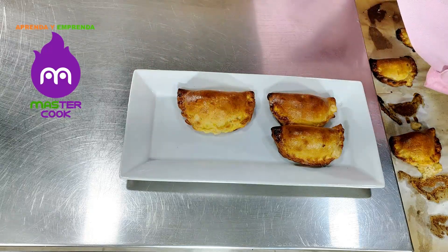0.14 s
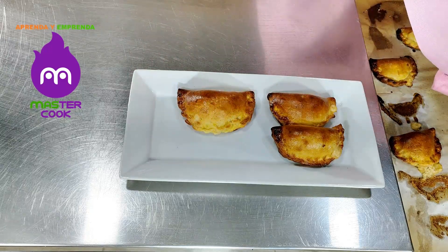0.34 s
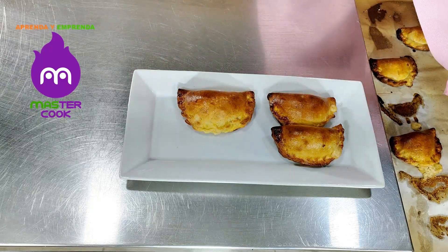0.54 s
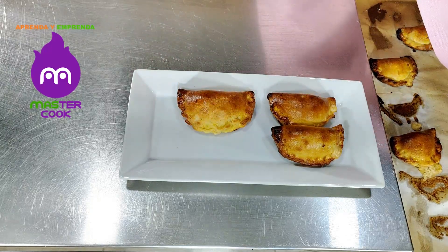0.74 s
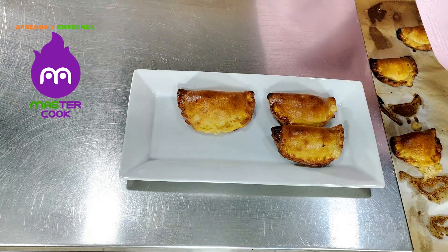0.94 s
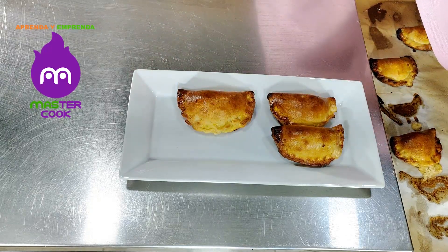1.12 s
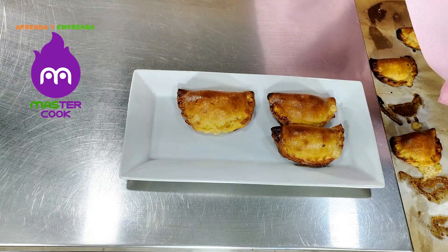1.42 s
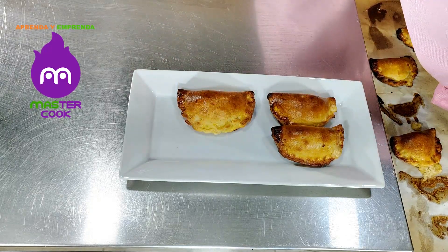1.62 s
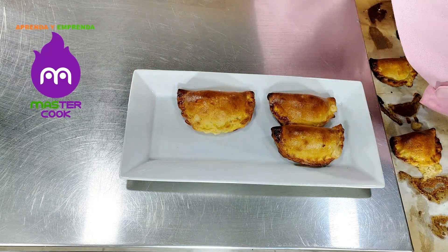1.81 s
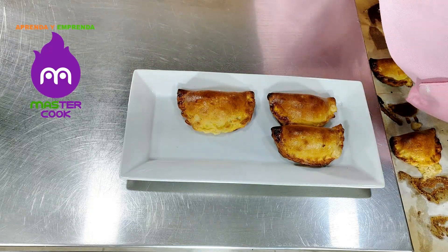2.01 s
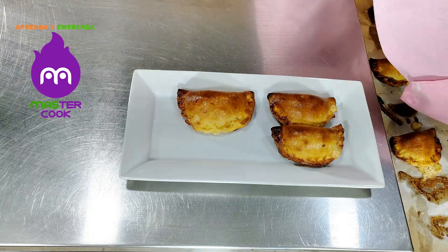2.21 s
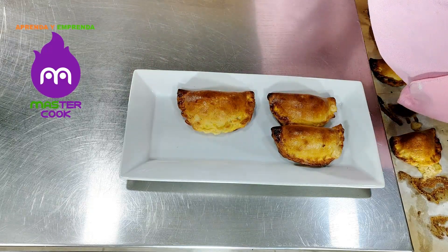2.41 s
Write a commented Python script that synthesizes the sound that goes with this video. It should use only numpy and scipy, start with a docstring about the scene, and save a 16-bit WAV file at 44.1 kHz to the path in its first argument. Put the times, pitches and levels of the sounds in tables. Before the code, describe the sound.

After a nearly quiet start, dry paper crackles loudly in two dense pulls, then a shorter, lighter one, fading to sparse ticks; close stereo microphones, sound stronger and brighter on the right, low kitchen hum underneath.

```python
"""First come faint crackles over a low, wavering hum; then loud snaps, as baking paper is pulled off pastries.
In three pulls, close by and to the right, creases snap as short noise bursts through a ringing filter, while
random ticks and a dense fizz make the crust letting go. Filtered noise and random clicks make the rustle and
soft thuds. A metal tray rings along, and echoes and a short blend of random tails give the hard kitchen.
"""
import sys
import numpy as np
from scipy import signal
from scipy.fft import rfft, irfft
from scipy.io import wavfile

SR = 44100
rng = np.random.default_rng(int(sys.argv[2]) if len(sys.argv) > 2 else 0)


def to_wav(sig):
    """Store sig (one row per channel, or 1-D mono) as 16-bit WAV at the path in sys.argv[1].

    Samples outside -1..1 are clipped; the rate is SR.
    """
    pcm = np.clip(np.atleast_2d(sig), -1, 1) * 32767
    pcm = np.round(pcm).astype(np.int16)
    wavfile.write(sys.argv[1], SR, pcm.T)  # frames by channels


N = 112454  # length in samples

# creases snapping over
# [t/s, strength/dB before SNAP_DB, ring f/Hz, treble/dB, share of energy in the flutter (0-1)]
CREASE_SNAPS = [(0.009, -25, 3260, -8, 0.7), (0.0461, -24.5, 3220, -26, 0.8), (0.0695, -29, 4480, -21, 0.7),
                (0.113, -19, 5630, -6, 0.3), (0.1817, -13, 5600, -2, 0.4), (0.192, -8.5, 5940, -6, 0.65),
                (0.2023, -8, 6420, 0, 0), (0.2137, -6, 5600, -9, 0.5), (0.2203, -6, 5840, -9, 0.36),
                (0.2291, -8, 5030, -8, 0.5), (0.2517, 1.5, 5300, -5, 0.65), (0.261, -3.5, 5330, -14, 0.86),
                (0.2868, 1, 5760, -6.5, 0.24), (0.2914, -4, 5700, -15, 0.7), (0.299, 2.5, 5720, -9, 0.1),
                (0.303, -3, 5860, -6, 0.4), (0.313, -1.5, 5530, -2, 0.6), (0.3258, 3.5, 5900, -3, 0.54),
                (0.3453, -9, 5110, 9, 0.8), (0.3491, -4, 4520, -21, 0.3), (0.3597, -11, 5610, -20, 0.4),
                (0.4069, -3.5, 5630, 0, 0.84), (0.41, -1.5, 5330, -16, 0.06), (0.422, -5, 5530, -7, 0),
                (0.4454, -2.5, 3980, -8, 0.5), (0.4646, -12, 3600, -3, 0.7), (0.5045, 1, 5000, -7.5, 0.3),
                (0.5127, 3.5, 4070, -7, 0.8), (0.5166, -1, 5050, -7, 0.8), (0.5573, 0.5, 5330, -10, 0.85),
                (0.561, 1, 5770, -9, 0.3), (0.5766, -4.5, 6360, -2, 0.5), (0.6096, -10.5, 3400, -8, 0.4),
                (0.624, -7.5, 6960, 1, 0.1), (0.6687, -8, 4960, -5, 0.51), (0.6981, -4, 5280, -1, 0.4),
                (0.7079, -1.5, 5900, -11, 0.7), (0.7101, -1.5, 6900, -13, 0.65),
                (0.7435, -2, 5100, -22, 0.3), (0.78, -1, 3960, -11, 0.22), (0.8033, -11, 6000, -8, 0.31),
                (0.81, -7.5, 4140, -5, 0.2), (0.8187, -2, 7180, -3, 0.25), (0.8214, -4.5, 3080, -27, 0.76),
                (0.8358, -7.5, 3900, 2.5, 0.6), (0.8636, -13, 4100, -3, 0), (0.8816, -21, 4370, 7, 0.3),
                (0.9456, -13, 5470, -13, 0.6), (0.9649, 0.5, 4340, -6.5, 0.45),
                (0.9892, -5.5, 4300, -4, 0.2), (1.0264, -2.5, 6320, -6.5, 0.63),
                (1.0482, -6.5, 5000, -10, 0.5), (1.07, -11.5, 5800, -5, 0.42), (1.0968, -1.5, 5490, 1, 0.3),
                (1.1004, -2.5, 5680, -2.5, 0.4), (1.1241, -3.5, 4240, -10, 0.4),
                (1.1394, 3.5, 4890, -3.5, 0.12), (1.143, -2, 5460, -16, 0.5), (1.1827, 1.5, 5980, -7, 0.4),
                (1.2, 5, 6100, -7.5, 0.18), (1.2128, 4.5, 4940, -2.5, 0.77), (1.2629, -9.5, 5030, -18, 0),
                (1.3119, -0.5, 5290, -4.5, 0.51), (1.3256, -3, 3870, -6, 0.6), (1.3471, -6.5, 5840, -4, 0),
                (1.362, 4, 4300, -8, 0.48), (1.3677, 5, 6400, -6, 0.7), (1.3696, 5, 5620, -13, 0.46),
                (1.386, -12, 5920, -4, 0.8), (1.4686, -9.5, 4210, -12, 0.4), (1.503, 1.5, 5250, -13.5, 0.5),
                (1.535, -7.5, 6400, -11.5, 0.1), (1.557, -12.5, 6700, -7, 0.1), (1.606, -12.5, 6100, -3, 0),
                (1.6437, -5, 4830, -3, 0.3), (1.7261, -21, 4950, -27, 0.4), (1.815, -13, 6750, -14.5, 0.06),
                (1.8487, -16, 6200, -15, 0.5), (1.862, -11, 6260, -10, 0.65), (1.8758, -9.5, 5650, -8, 0.2),
                (1.8927, -12.5, 7100, -15, 0.52), (1.9356, -6, 5490, 5, 0.85),
                (1.9449, 0.5, 5500, -3.5, 0.57), (1.9475, -4, 5300, -10, 0.4),
                (1.9675, -9.5, 6300, -4, 0.5), (2.0863, -16, 6300, -7, 0.26),
                (2.118, -17.5, 5130, -2, 0.04), (2.4282, -12.5, 7570, -4, 0.15),
                (2.4795, -26, 3100, -13, 0.8), (2.5437, -15.5, 5710, -10, 0.05)]
# tone of a snap before its ring is added [f/Hz, level/dB per Hz]
SNAP_TONE = [(100, -25), (500, -28), (1200, -17.5), (2200, -2.5), (3300, 0.5), (6000, -1), (8000, 1.5),
             (11500, 8), (16000, -3)]
SNAP_DB = -2.5  # added to the strength of every snap
CRACK_S, FLUTTER_S = .00028, .0021  # time scales of the sharp crack and the flutter
LEAD_S = .0003  # a snap starts this far ahead of its listed time
RING_DB, RING_OCTAVES = 9.5, .32  # height and width of a snap's ring; ticks share the width
TREBLE_HZ = 8710  # the treble setting acts mostly above this

# loudness of the crackle, one curve for each pull and for the sheet settling
# [t/s, level/dB before TICK_DB or FIZZ_DB]
CRACKLE_CURVES = [
    [(0, -52), (.1, -67), (.17, -72)],
    [(.175, -68), (.2, -38.5), (.275, -39.5), (.3, -35), (.345, -26), (.385, -47), (.41, -33), (.48, -29),
     (.52, -28), (.575, -36.5), (.66, -36.5), (.705, -29.5), (.765, -46.5), (.83, -38.5), (.87, -45),
     (.92, -81)],
    [(.955, -43), (.985, -30.5), (1.015, -44.5), (1.08, -37.5), (1.1, -28), (1.16, -35), (1.215, -31),
     (1.25, -38.5), (1.3, -48), (1.36, -43), (1.41, -33), (1.5, -48), (1.59, -43.5), (1.645, -40),
     (1.68, -72)],
    [(1.7, -55.5), (1.82, -47), (1.865, -45.5), (1.925, -45.5), (1.945, -32.5), (1.98, -41.5), (2.02, -52),
     (2.07, -49), (2.11, -52), (2.2, -68), (2.35, -74)],
    [(2.42, -56), (2.445, -56), (2.48, -54.5), (2.52, -68), (2.55, -42.5)],
]
# tone of the crackling paper, before a tick's own ring [f/Hz, level/dB per Hz]
PAPER_TONE = [(100, -48), (450, -11.5), (900, -15.5), (1500, -9.5), (2200, 0), (3200, 5), (5700, 3),
              (7800, 2), (8900, -7), (11500, -3), (14000, -6), (16000, -22)]
TICKS_PER_S, TICK_SPREAD_DB, TICK_DB = 380, 3.6, -2.5  # rate, unevenness, level
TICK_RING_DB, TICK_TREBLE_SPREAD_DB = 6.5, 4.5
FIZZ_SLIPS_PER_S, FIZZ_SPREAD_DB, FIZZ_DB = 4000, 3, -12
LEFT_OWN = .72  # share of the left side's energy that is unlike the right's, before filtering

# the whole sheet bending [t/s, level/dB]
SHEET_LEVEL = [(0, -63), (.16, -72), (.28, -63), (.33, -54), (.48, -54.5), (.52, -42), (.57, -44),
               (.62, -53), (.72, -48.5), (.85, -49), (.89, -63), (.97, -53.5), (1.07, -57), (1.12, -47.5),
               (1.23, -46), (1.31, -53), (1.375, -48.5), (1.46, -55), (1.8, -63.5), (1.96, -55),
               (2.02, -74), (2.25, -80.5), (2.55, -76)]
# tone of its dull rustle [f/Hz, level/dB per Hz]
SHEET_TONE = [(60, -10.5), (200, -7.5), (430, -10), (620, -3.5), (1000, 0.5), (1500, 3), (2100, 9),
              (3200, -27.5), (8000, -29)]
# short bands of rustling noise: scrapes, mid-pitched thuds and one low murmur at the start
# [t/s, length/s, level/dB, centre f/Hz]
RUSTLE_BANDS = [(0, 0.063, -62.5, 410), (.502, 0.027, -45, 800), (1.09, 0.1, -47.5, 1530),
                (1.362, 0.025, -47.5, 934), (1.59, .065, -54, 11140), (1.84, 0.09, -50, 1820),
                (2.04, 0.043, -46.5, 11000)]
BAND_OCTAVES = .24  # from the centre to half gain

# ringing modes of the metal tray [f/Hz, level/dB against the paper]
TRAY_MODES = [(1478, 5.5), (2365, -3), (2533, -6), (3500, -2), (3877, -17), (3991, -19)]
TRAY_T60_S = .15  # time to fade by 60 dB

# fade of the kitchen's tail [f/Hz, time to fade by 60 dB/s]
ROOM_FADE = [(200, 0.32), (1000, 0.68), (4000, 0.41), (8000, 0.33), (16000, 0.13)]
# near echoes off the worktop and nearby things [delay/s, left level/dB, right level/dB]
NEAR_ECHOES = [(.0018, -15, -53), (.0082, -17.5, -29), (0.0137, -20.5, -20)]
# dulling of the direct sound at the left microphone [f/Hz, level/dB]
LEFT_DULLING = [(200, -2), (1200, -2.5), (2400, -6.5), (4000, -9), (8000, -14), (16000, -22)]
LEFT_LAG_S = .0003
ROOM_DB, ROOM_LEFT_DB = -9, -4  # right tail level; left tail relative to right
ROOM_GAP_S = .006  # delay before the tail
TAIL_SWING_S = .05  # time for each tail's share to swing from one extreme to the other

# soft thuds of pastry and hand on the tray [t/s, length/s, level/dB]
SOFT_THUDS = [(0.157, 0.33, -62.5), (0.486, 0.038, -62), (0.546, 0.047, -51.5), (1.185, 0.061, -56),
              (1.62, 0.04, -64), (1.934, 0.05, -62.5)]
# tone of the thuds [f/Hz, level/dB per Hz]
THUD_TONE = [(25, -2), (70, 9), (120, 5.5), (240, 11), (400, 1), (600, -7), (1000, 3), (3000, -58)]

# a faint, wandering low rumble [t/s, centre f/Hz, level/dB]
RUMBLE_PATH = [(0, 225.3, -61), (.19, 205, -67), (.25, 240.3, -60), (.3, 251.6, -66), (.35, 320.6, -62),
               (.46, 300.3, -68.5), (.62, 129.6, -66.5), (.95, 130.2, -65.5), (1.14, 280.6, -61.5)]
# how the rumble spreads around its centre [distance from centre f/Hz, level/dB]
RUMBLE_BLUR = [(28, 0), (220, -28)]

# tone of the steady kitchen air [f/Hz, level/dB per Hz]
AIR_TONE = [(20, -22.5), (50, -0.5), (75, -11), (110, 4), (150, -3), (210, 3), (300, 0), (450, -11.5),
            (850, -10.5), (1150, -31), (2500, -20.5), (7500, -21.5), (16000, -38)]
AIR_DB = -67
# loudness of the low hum [t/s, level/dB]
HUM_LEVEL = [(0, -75.5), (.9, -71), (1.35, -76), (1.58, -66), (1.7, -77.5), (1.9, -81), (2.15, -66),
             (2.35, -92), (2.55, -94)]
# slow wavering of the hum's pitch [f/Hz, level/dB]
HUM_WAVER = [(8, 11), (30, -61)]
HUM_HZ, HUM_WAVER_HZ = 75, 4  # middle pitch and rms size of its wavering

EDGE_HZ = 16000  # sound well above this is removed


def snaps():
    """A crease flips with a short crack, then flutters for a few milliseconds."""
    out = np.zeros((2, N))
    for start, db, hz, treble_db, share in CREASE_SNAPS:
        share = np.clip(share, .05, .95)
        click = ring(SNAP_TONE, hz, RING_DB, treble_db)
        crack = np.sqrt(1 - share) * burst(click, CRACK_S)
        flutter = np.sqrt(share) * burst(click, FLUTTER_S)
        sound = crack + flutter
        sound /= np.linalg.norm(sound[1])  # right side gets energy 1
        add(out, start - LEAD_S, amp(db + SNAP_DB) * sound)
    return out


def crackle(count=90):
    """Small facets tick, each with its own ring, over the fine fizz of crust letting go."""
    ticks = np.zeros((2, N))
    ticks_each = round(TICKS_PER_S * N / SR / count)
    for hz in np.geomspace(2700, 9000, count):
        treble_db = TICK_TREBLE_SPREAD_DB * rng.standard_normal()
        click = ring(PAPER_TONE, hz, TICK_RING_DB, treble_db)
        tick = burst(click, rng.uniform(CRACK_S, FLUTTER_S))
        for when, size in rng.random((ticks_each, 2)):
            # few ticks are big; the small offset caps the biggest
            tick_db = -TICK_SPREAD_DB * np.log(size + .087)
            add(ticks, when * N / SR, amp(tick_db) * tick)
    fizz = colour(slips(FIZZ_SLIPS_PER_S, FIZZ_SPREAD_DB), PAPER_TONE)
    loudness = sum(level(curve) for curve in CRACKLE_CURVES)
    return loudness * (amp(TICK_DB) * unit(ticks) + amp(FIZZ_DB) * unit(fizz))


def sheet():
    """The whole sheet bends in many tiny slips, heard as a duller rustle."""
    rustle = colour(slips(1500, 5.0), SHEET_TONE)
    return level(SHEET_LEVEL) * unit(rustle)


def rustle_bands():
    """Scrapes, mid-pitched thuds and a low murmur: dense random clicks through one resonance each."""
    out = np.zeros((2, N))
    f = np.fft.rfftfreq(N, 1 / SR)
    for start, length, db, hz in RUSTLE_BANDS:
        band = 1 / (1 + (np.log2((f + 1) / hz) / BAND_OCTAVES) ** 2)
        noise = irfft(rfft(slips(3000, 4.7)) * band, N)
        out += amp(db) * swell(start, length) * unit(noise)
    return out


def tray(paper):
    """The metal tray under the paper rings along in a few fading tones."""
    t = np.arange(SR // 2) / SR
    modes = sum(amp(db - 60 * t / TRAY_T60_S) * np.cos(2 * np.pi * hz * t) for hz, db in TRAY_MODES)
    modes *= 2 * np.log(1000) / (TRAY_T60_S * SR)  # makes each level the gain at its pitch
    return signal.fftconvolve(paper, modes[None], axes=1)[:, :N]


def kitchen(paper, count=3):
    """Sound reaches the left later and duller; echoes follow, and a blend of tails with swinging shares."""
    out = np.zeros((2, N))
    out[1] = paper[1]
    add(out[:1], LEFT_LAG_S, colour(paper[:1], LEFT_DULLING))
    for delay, left_db, right_db in NEAR_ECHOES:
        add(out, delay, amp([[left_db], [right_db]]) * paper)
    t = np.arange(N) / SR
    for k in range(count):
        # the shares swing steadily in turn, keeping the total energy even
        share = np.sqrt(2 / count) * np.cos(np.pi * (t / TAIL_SWING_S + k / count))
        add(out, ROOM_GAP_S, signal.fftconvolve(share * paper[1:], tail(), axes=1))
    return out


def tail(size=256):
    """Stereo ring of the room: sparse random reflections, the treble dying first."""
    taps = rng.standard_normal((2, SR)) * (rng.random((2, SR)) < 2500 / SR)
    hz, t, z = signal.stft(taps, SR, nperseg=size)
    fade = amp(-60 * t / read(ROOM_FADE, hz)[:, None])
    echo = signal.istft(z * fade, SR, nperseg=size)[1]
    echo /= np.linalg.norm(echo, axis=1, keepdims=True)
    return echo * amp([[ROOM_DB + ROOM_LEFT_DB], [ROOM_DB]])


def thuds():
    """Soft swells of bass noise as the pastry and the hand shift on the tray."""
    loudness = sum(amp(db) * swell(start, length) for start, length, db in SOFT_THUDS)
    return loudness * low_noise(THUD_TONE, apart=.1)


def rumble():
    """A faint band of low noise, shifted up to a centre pitch that wanders."""
    s, hz, db = np.transpose(RUMBLE_PATH)
    phase = 2 * np.pi * np.cumsum(np.interp(np.arange(N) / SR, s, hz)) / SR
    a, b = colour(rng.standard_normal((2, N)), RUMBLE_BLUR)
    return level(np.c_[s, db]) * unit(a * np.cos(phase) + b * np.sin(phase))


def room_tone():
    """Steady kitchen air as noise, and a low hum whose pitch and level waver."""
    waver = unit(colour(rng.standard_normal(N), HUM_WAVER))
    hum = unit(np.sin(2 * np.pi * np.cumsum(HUM_HZ + HUM_WAVER_HZ * waver) / SR))
    return amp(AIR_DB) * low_noise(AIR_TONE, apart=.43) + level(HUM_LEVEL) * hum


def ring(points, hz, ring_db, treble_db=0, size=512):
    """Click of one paper facet with a broad resonance, its energy as early as possible; energy 1."""
    f = np.fft.rfftfreq(size, 1 / SR)
    bump = np.exp(-.5 * (np.log2((f + 1) / hz) / RING_OCTAVES) ** 2)
    shelf = .5 + .5 * np.tanh(10 * np.log((f + 1) / TREBLE_HZ))
    db = read(points, f) + ring_db * bump + treble_db * shelf
    log_gain = np.log(amp(np.r_[db, db[-2:0:-1]]))
    # the phase that goes with this loudness curve when nothing sounds ahead of the click
    click = np.fft.ifft(np.exp(np.conj(signal.hilbert(log_gain)))).real
    return click / np.linalg.norm(click)


def burst(click, seconds, size=700):
    """A swarm of slips swells and dies on a given time scale, ringing one facet; energy 1 a side."""
    t = np.arange(size) / SR
    envelope = (t / seconds) ** .5 * np.exp(-t / seconds)
    swarm = pair(*rng.standard_normal((2, size))) * envelope
    sound = signal.fftconvolve(swarm, click[None], axes=1)
    return sound / np.linalg.norm(sound, axis=1, keepdims=True)


def slips(per_s, spread_db):
    """Stereo train of tiny slips at random times and of very uneven size."""
    happens = rng.random(N) < per_s / SR
    size = amp(spread_db * np.minimum(rng.exponential(1, N), 3.5)) * happens
    own, right = size * rng.choice([-1., 1.], (2, N))
    return unit(pair(own, right))


def pair(own, right):
    """Left and right sides that are partly alike."""
    return np.array([np.sqrt(1 - LEFT_OWN) * right + np.sqrt(LEFT_OWN) * own, right])


def swell(start, length):
    """Rounded rise and fall, from 0 to 1 and back."""
    t = np.arange(N) / SR
    return np.sin(np.pi * np.clip((t - start) / length, 0, 1)).clip(0) ** .5


def low_noise(points, apart):
    """Coloured noise, partly shared by both sides; a bigger apart makes them less alike."""
    mid, side = rng.standard_normal((2, N))
    return unit(colour(np.array([mid + apart * side, mid - apart * side]), points))


def colour(x, points):
    """Filters a sound by a spectrum table."""
    gain = amp(read(points, np.fft.rfftfreq(2 * N, 1 / SR)))
    return irfft(rfft(x, 2 * N) * gain)[..., :N]


def read(points, hz):
    """Reads a table between its rows, on a log-frequency axis."""
    f, value = np.transpose(points)
    return np.interp(np.log(hz + 1), np.log(f), value)


def level(points):
    """Gain over time from a dB curve, practically silent outside it."""
    s, db = np.transpose(points)
    return amp(np.interp(np.arange(N) / SR, s, db, left=-140, right=-140))


def add(mix, start, sound):
    """Mixes a sound in at a time in seconds."""
    part = mix[:, max(round(start * SR), 0):][:, :sound.shape[1]]
    part += sound[:, :part.shape[1]]


def amp(db):
    """Decibels to gain."""
    return 10 ** (np.asarray(db) / 20)


def unit(x):
    """Scales to an rms (average strength) of 1."""
    return x / np.sqrt(np.mean(x ** 2) + 1e-20)


def scene():
    """The paper on its tray in the kitchen, with the thuds, the rumble and the room tone."""
    paper = snaps() + crackle() + sheet() + rustle_bands()
    return kitchen(paper + tray(paper)) + thuds() + rumble() + room_tone()


def record(dry):
    """The recorder's band limit: a low-pass filter takes away the highest treble."""
    low_pass = signal.firwin(255, EDGE_HZ, window=("kaiser", 8), fs=SR)
    return signal.oaconvolve(dry, low_pass[None], "same")


dry = scene()
out = record(dry)
to_wav(out)
```